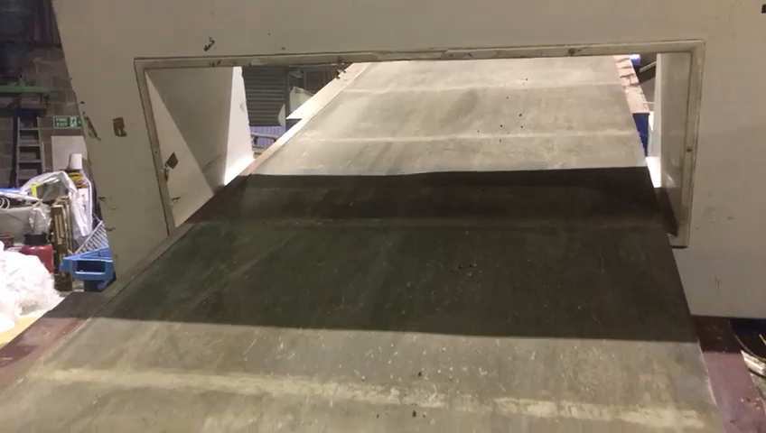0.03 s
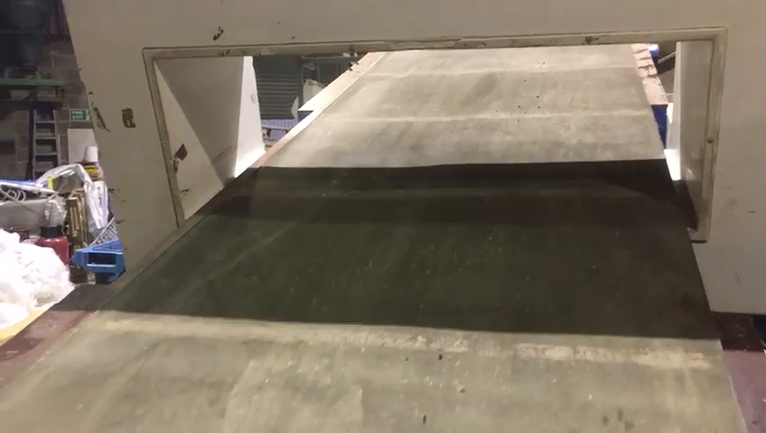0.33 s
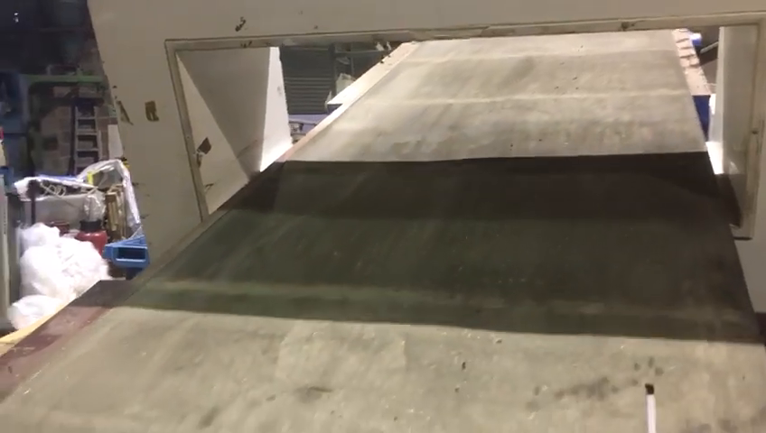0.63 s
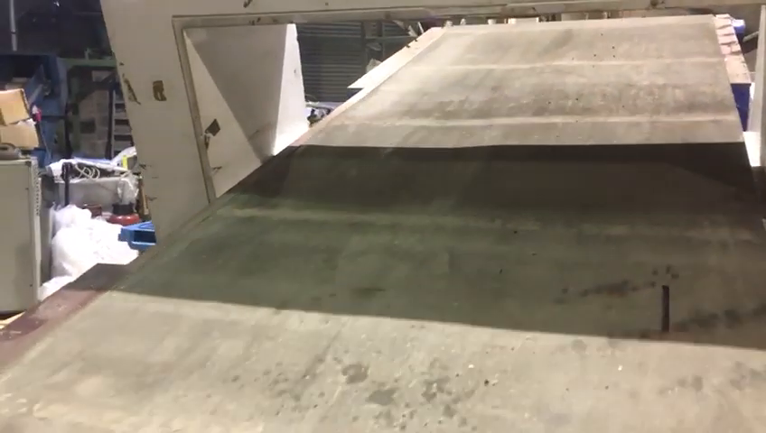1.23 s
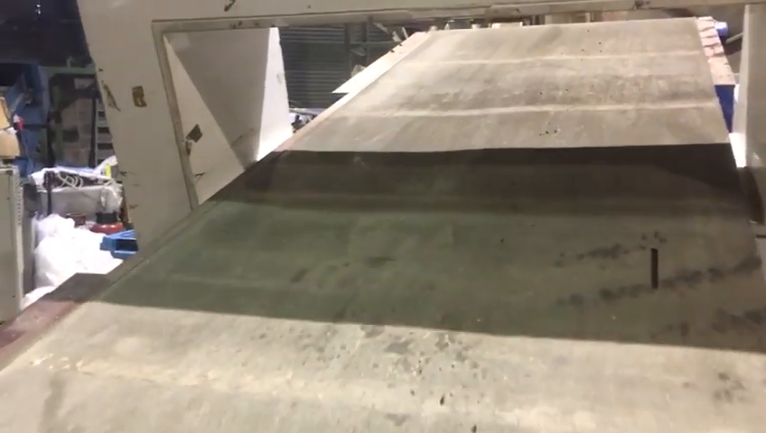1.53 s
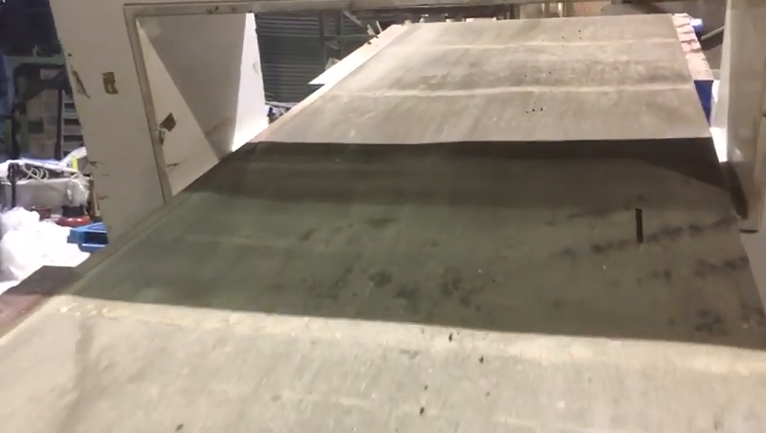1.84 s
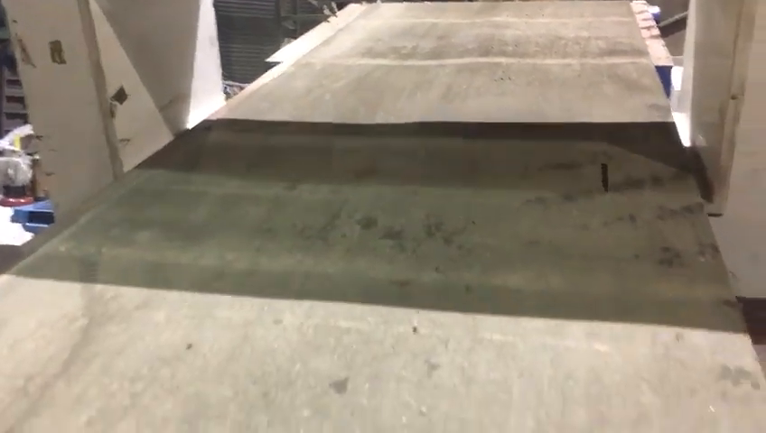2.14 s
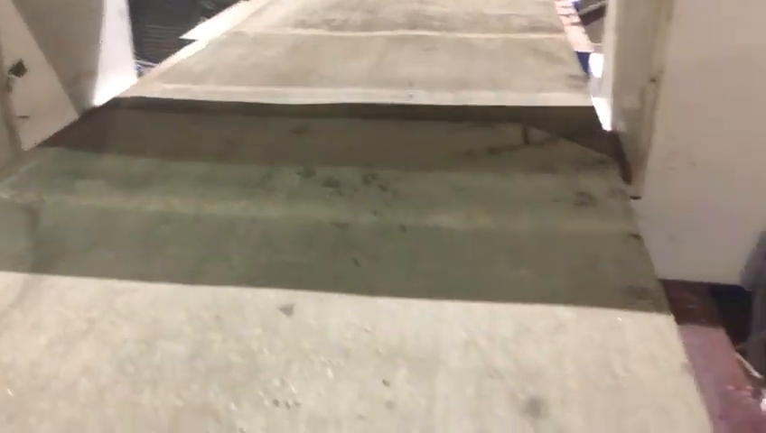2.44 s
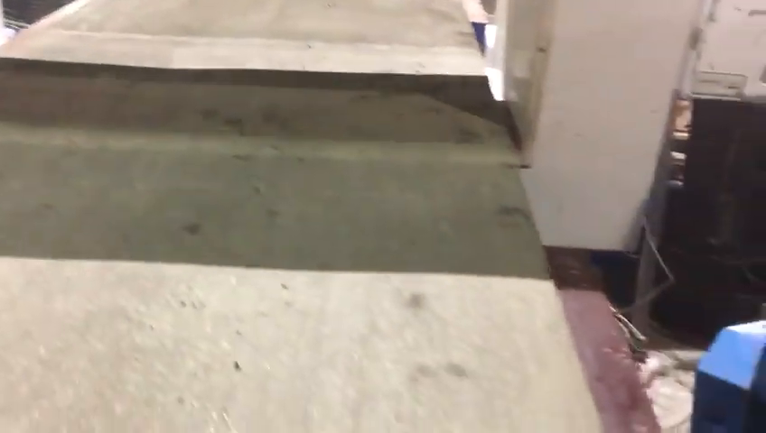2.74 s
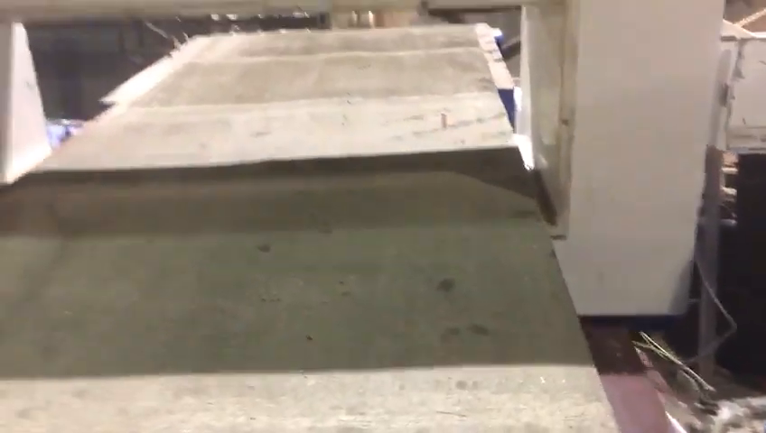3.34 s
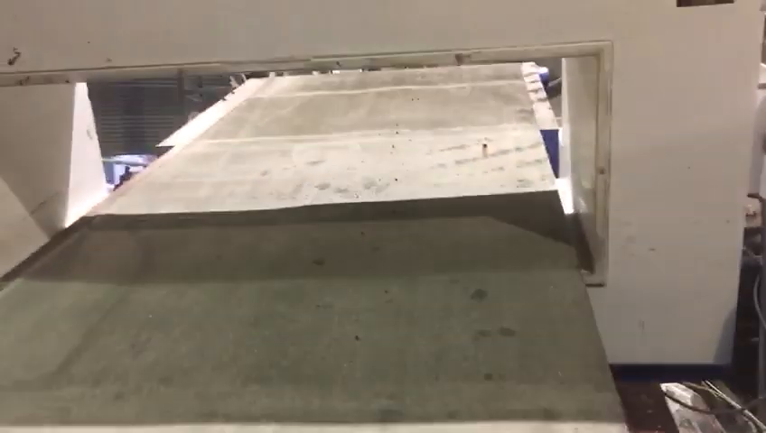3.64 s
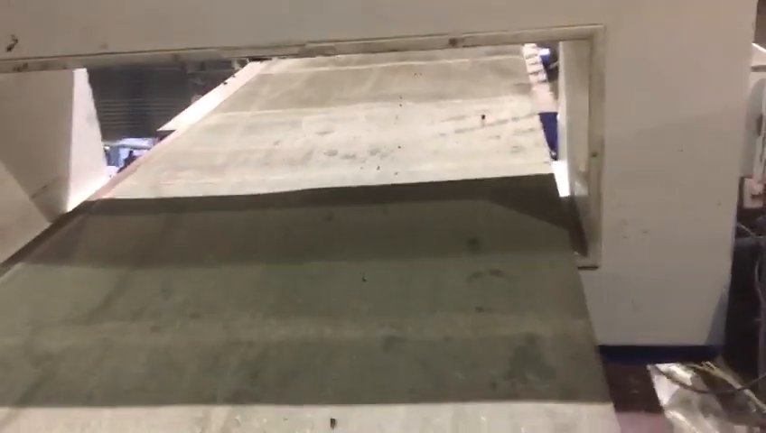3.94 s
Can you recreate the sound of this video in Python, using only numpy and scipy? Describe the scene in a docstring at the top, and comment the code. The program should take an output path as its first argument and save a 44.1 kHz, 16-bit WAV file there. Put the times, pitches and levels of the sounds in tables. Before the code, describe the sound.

A conveyor drones steadily in an industrial hall, its wavering rotor whine riding over a broad machinery roar and low motor hum. Heard from beside it, the belt hisses softly and bits of grit tick now and then.

```python
"""An industrial hall, beside a running belt conveyor, heard while the listener turns.
A fast rotor whines in a stack of fluttering partials that swell and fade; motors hum underneath.
Machinery roars all around as a bed of shaped noise. The belt hisses as it slides,
and bits of grit tick on it now and then."""
import sys
import numpy as np
from scipy import signal
from scipy.fft import rfft, irfft
from scipy.io import wavfile
from scipy.ndimage import uniform_filter1d

SR = 44100
rng = np.random.default_rng(int(sys.argv[2]) if len(sys.argv) > 2 else 0)


def dump_mix(stems):
    """Bounce the given channels to the path in sys.argv[1] as a 16-bit WAV at rate SR."""
    frames = np.atleast_2d(stems).T  # one column per channel
    limited = np.clip(frames, -1, 1)  # hard clip at full scale
    pcm = np.round(limited * 32767).astype(np.int16)
    wavfile.write(sys.argv[1], SR, pcm)


N = 176400

# Swells of the whine's first six harmonics: time_s, level_db
SWELL_1 = [(0.1, -49), (0.62, -42), (0.72, -39), (0.88, -39), (1.0, -46.5), (2.5, -51.5), (3.3, -45.5),
           (4.0, -57)]
SWELL_2 = [(0.1, -39), (0.33, -28.5), (0.43, -37.5), (0.48, -33), (0.535, -45), (0.6, -30.5), (0.84, -34),
           (0.92, -31), (1.17, -30), (1.29, -39.5), (1.43, -33), (1.52, -46.5), (1.6, -28), (1.73, -31.5),
           (1.785, -40), (1.85, -33), (2.15, -35), (2.24, -28), (2.29, -41), (2.42, -32), (2.62, -32),
           (2.86, -25), (3.03, -24.5), (3.18, -32), (3.38, -30), (3.52, -33), (3.8, -24.5), (4.0, -30)]
SWELL_3 = [(0.1, -45.5), (0.9, -42), (1.1, -38), (1.3, -46), (1.8, -39), (2.26, -46.5), (2.34, -32),
           (2.56, -33), (2.66, -47), (4.0, -46)]
SWELL_4 = [(0.1, -26.5), (0.26, -34.5), (0.5, -27.5), (0.7, -32.5), (0.87, -46.5), (0.97, -28), (1.22, -36),
           (1.33, -32.5), (1.5, -28), (1.56, -45), (1.63, -32), (1.88, -34), (2.05, -32.5), (2.28, -32.5),
           (2.42, -41), (2.6, -30), (3.13, -44.5), (3.24, -35), (3.6, -31.5), (3.85, -36.5), (4.0, -29.5)]
SWELL_5 = [(0.1, -36), (0.6, -47), (0.72, -32), (0.87, -43.5), (1.1, -34.5), (1.35, -42), (2.03, -36.5),
           (2.52, -37.5), (2.9, -43.5), (4.0, -41)]
SWELL_6 = [(0.1, -41), (0.2, -35), (0.38, -41), (0.55, -41), (1.1, -37), (2.0, -43.5), (2.45, -38),
           (3.15, -37.5), (3.6, -41.5), (4.0, -42.5)]
# Body of the whine: harmonic, swell_curve, flutter_share
WHINE_BODY = [(1, SWELL_1, 0.21), (2, SWELL_2, 0.1), (3, SWELL_3, 0.09),
              (4, SWELL_4, 0.18), (5, SWELL_5, 0.41), (6, SWELL_6, 0.58)]
# Top of the whine, without swells: harmonic, level_db
WHINE_TOP = [(7, -43.5), (8, -47.5), (9, -51.5), (10, -57), (11, -60.5)]
# Motor tones: pitch_hz, level_db
MOTOR_TONES = [(53.8, -44.5), (107.6, -46.5), (161.4, -51), (200.1, -51), (215.3, -51), (222.0, -51.5)]
# Tone colour of the machinery roar: frequency_hz, gain_db
ROAR_EQ = [(20, -25), (36, -16), (48, -13), (58, -5), (68, 5), (80, -6), (118, 2), (150, -7), (200, -7.5),
           (280, -5), (335, -13), (430, -14.5), (520, -12.5), (585, -1.5), (645, -4.5), (700, -10.5),
           (830, -9.5), (930, -5.5), (1060, -7), (1170, -0.5), (1290, -6.5), (1580, -7.5), (1800, -7.5),
           (2300, -11.5), (2800, -17), (3600, -24.5), (4900, -32.5), (12000, -56.5)]
# Fader rides on the roar's rumble, mids and highs: time_s, gain_db
RUMBLE_RIDE = [(0.1, 3), (0.25, 6), (0.48, -1), (0.65, -4), (1.3, -1.5), (1.7, -1), (2.3, -1), (2.85, 1),
               (3.03, 3), (3.2, -1), (3.7, -3), (3.9, 5), (4.0, -8)]
ROAR_MID_RIDE = [(0.1, 0.5), (0.85, 2.3), (1.15, 1), (1.6, -1), (2.1, 1.8), (2.45, 1), (2.8, -1),
                 (3.25, 1.2), (3.55, -2.8), (4.0, -1.5)]
ROAR_HIGH_RIDE = [(0.1, 0.5), (0.8, -1.5), (1.15, 1), (1.45, -0.5), (1.75, 0.4), (2.45, 1.5), (2.9, -1.5),
                  (3.2, 2), (3.55, -1.5), (4.0, -1.7)]
# Tone colour of the belt hiss: frequency_hz, gain_db
HISS_EQ = [(20, -43), (2000, -21), (3500, -5), (4400, 0), (4950, -4), (5400, 1), (6600, -1.5), (7600, -4),
           (8900, -3.5), (9800, -6), (10400, -13), (11000, -7.5), (12000, -17)]
# Fader rides on the whole hiss and on its airy top: time_s, gain_db
HISS_RIDE = [(0.1, -49), (0.5, -50), (1.1, -48), (1.8, -49.5), (2.3, -46), (2.8, -46), (3.2, -46),
             (3.6, -48.5), (4.0, -49)]
HISS_AIR_RIDE = [(0.1, 0.5), (0.7, -2), (1.3, -1.5), (1.9, 2), (2.55, -2.5), (3.1, -2), (4.0, -1)]
# Foreground ticks of grit: start_s, level_db, decay_t60_s
GRIT_TICKS = [(0.36, -40, 0.085), (0.374, -42, .04), (1.158, -44, .05), (1.195, -36, 0.12),
              (1.22, -44, 0.29), (1.528, -43, .025), (2.535, -45, .08), (3.891, -34, .015)]
# Tone colour of the grit: frequency_hz, gain_db
GRIT_EQ = [(20, -50), (2000, -16), (4500, 0), (7000, -5), (9000, 2.5), (12000, -7.5)]


def amp(db):
    """Decibels to gain."""
    return 10 ** (np.asarray(db) / 20)


def unit(x):
    """Scales to rms 1."""
    return x / np.sqrt(np.mean(abs(x) ** 2) + 1e-20)


def fader(ride):
    """The gain at every sample of a ride drawn in decibels."""
    return amp(np.interp(np.arange(N) / SR, *np.transpose(ride)))


def equalise(x, curve):
    """Shapes a sound with an EQ curve drawn on a log-frequency axis."""
    hz, db = np.transpose(curve)
    bins_hz = np.fft.rfftfreq(N, 1 / SR)
    gain_db = np.interp(np.log(bins_hz + 1), np.log(hz + 1), db)
    return irfft(rfft(x) * amp(gain_db), N)


def crossover(x, hz):
    """The parts of a sound below and above a frequency."""
    low = signal.sosfiltfilt(signal.butter(2, hz, fs=SR, output="sos"), x)
    return low, x - low


def drift(width_hz, top_hz):
    """A slow random complex modulator, flat up to its width and falling steeply above its top rate."""
    hz = np.fft.fftfreq(N, 1 / SR)
    shape = 1 / np.sqrt((1 + (hz / width_hz) ** 2) * (1 + (hz / top_hz) ** 4))
    phases = np.exp(2j * np.pi * rng.random(N))
    return unit(np.fft.ifft(shape * (hz != 0) * phases))


def partial(cycles, flutter_share, width_hz, top_hz):
    """A tone: part of its power arrives steadily, part flutters after scattering round the hall."""
    carrier = np.exp(2j * np.pi * cycles)
    scattered = np.sqrt(flutter_share) * drift(width_hz, top_hz)
    return np.sqrt(2) * (carrier * (np.sqrt(1 - flutter_share) + scattered)).real


def restless_noise(patch_db, swell_db):
    """White noise with drifting louder and softer patches in its spectrum, and an overall swell."""
    real, imag, patches = rng.standard_normal((3, N // 128 + 5, 257))  # each: frames by frequency bins
    patches = uniform_filter1d(patches, size=22, axis=0)
    patches = unit(uniform_filter1d(patches, size=7, axis=1))
    spectra = (real + 1j * imag) * amp(patch_db * patches)
    noise = signal.istft(spectra.T, nperseg=512, noverlap=384)[1][:N]
    return noise * amp(swell_db * unit(drift(width_hz=3.3, top_hz=30).real))


def rotor_whine():
    """Harmonics ride one slightly wandering rotor speed; each drifts in phase as the listener moves."""
    pitch_hz, wander_depth, path_cycles, top_flutter_share = 296.4, 0.00187, 0.15, 0.49
    speed = 1 + wander_depth * unit(drift(width_hz=2.77, top_hz=5.54).real)
    cycles = np.cumsum(pitch_hz * speed) / SR
    harmonics = [(k, fader(swell), share) for k, swell, share in WHINE_BODY]
    harmonics += [(k, amp(db), top_flutter_share) for k, db in WHINE_TOP]
    whine = np.zeros(N)
    for k, gain, share in harmonics:
        path = rng.random() + path_cycles * unit(drift(width_hz=0.44, top_hz=0.88).real)
        whine += gain * partial(k * cycles + path, share, width_hz=k * 3.4, top_hz=k * 12.6)
    return whine


def motor_hum():
    """The motors lay low, nearly steady tones under the whine."""
    t = np.arange(N) / SR
    return sum(amp(db) * partial(hz * t + rng.random(), flutter_share=0.12, width_hz=1.1, top_hz=8.2)
               for hz, db in MOTOR_TONES)


def machinery_roar():
    """Rumble and rush of machinery, blurred by the hall; three bands rise and fall around its body."""
    noise = unit(equalise(restless_noise(patch_db=1.64, swell_db=0.5), ROAR_EQ))
    lower, upper = crossover(noise, hz=735)
    rumble, body = crossover(lower, hz=130)
    mids, highs = crossover(upper, hz=1850)
    moving = rumble * fader(RUMBLE_RIDE) + mids * fader(ROAR_MID_RIDE) + highs * fader(ROAR_HIGH_RIDE)
    return amp(-31) * (body + moving)


def belt_hiss():
    """The belt hisses as it slides over its bed, now brighter, now duller."""
    noise = unit(equalise(restless_noise(patch_db=1.4, swell_db=0.64), HISS_EQ))
    body, air = crossover(noise, hz=7500)
    return amp(-0.56) * fader(HISS_RIDE) * (body + air * fader(HISS_AIR_RIDE))


def grit_ticks():
    """Grit strikes the belt: a few scratchy bursts of bright noise over a sprinkle of faint ones."""
    attack_s = 0.002
    sprinkle_per_s, sprinkle_db, spread_db, sprinkle_t60_s = 45, -65, 1.5, 0.02
    t = np.arange(N) / SR
    tick_power = np.zeros(N)
    for start_s, level_db, t60_s in GRIT_TICKS:
        age = np.maximum(t - start_s, 0)
        attack = np.minimum(age / attack_s, 1)
        decay = np.exp(-np.log(1000) * age / t60_s)
        tick_power += (amp(level_db) * attack * decay) ** 2
    hits = rng.random(N) < sprinkle_per_s / SR
    strengths = amp(spread_db * np.minimum(rng.exponential(1, N), 3))
    decay_per_sample = np.exp(-np.log(1000) / (sprinkle_t60_s * SR))
    sprinkle = amp(sprinkle_db) * unit(signal.lfilter([1], [1, -decay_per_sample], hits * strengths))
    envelope = np.sqrt(tick_power + sprinkle ** 2)
    return envelope * unit(equalise(rng.standard_normal(N), GRIT_EQ))


def scene():
    """All five layers in a mono mix."""
    return (rotor_whine() + motor_hum() + machinery_roar() + belt_hiss() + grit_ticks())[None]


def record(dry):
    """The sound cuts in abruptly, and a steep low-pass takes off the very top."""
    start_s, fade_s, cutoff_hz = 0.083, 0.001, 12000
    gate = np.clip((np.arange(N) / SR - start_s) / fade_s, 0, 1)
    low_pass = signal.firwin(401, cutoff_hz, window=("kaiser", 9), fs=SR)
    return signal.oaconvolve(dry * gate, low_pass[None], "same")


dry = scene()
out = record(dry)
dump_mix(out)
```